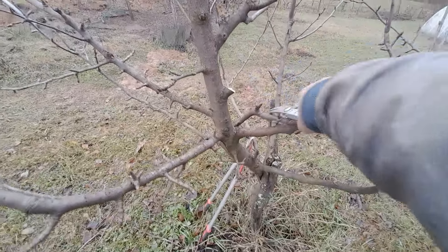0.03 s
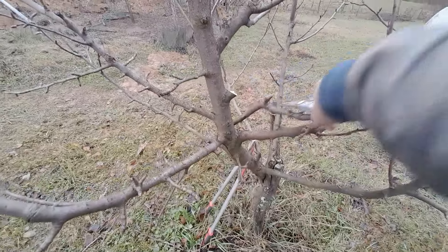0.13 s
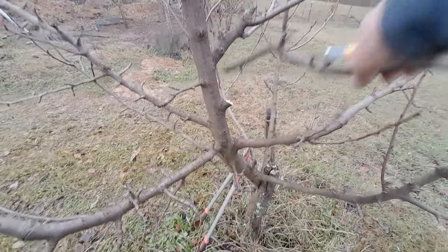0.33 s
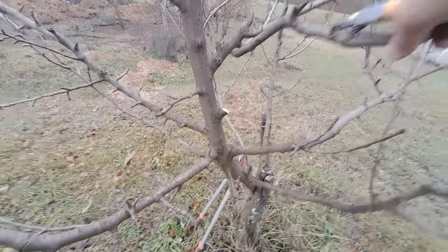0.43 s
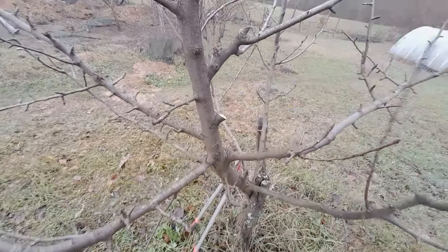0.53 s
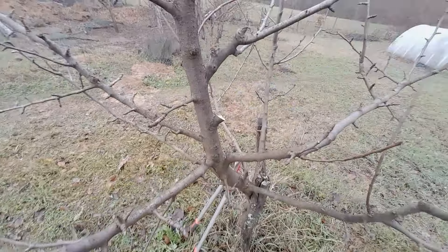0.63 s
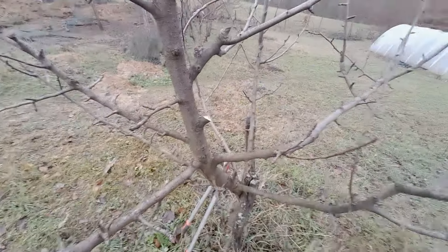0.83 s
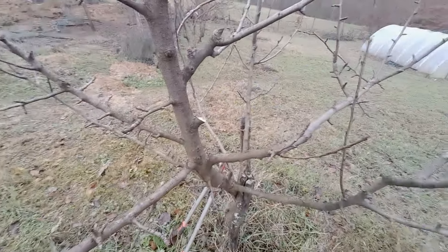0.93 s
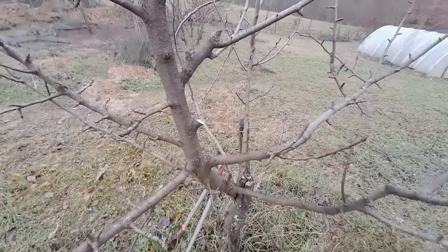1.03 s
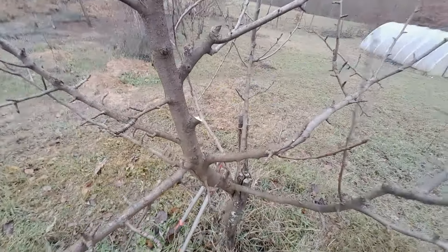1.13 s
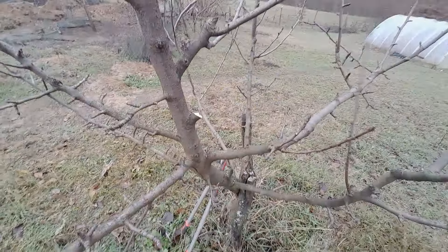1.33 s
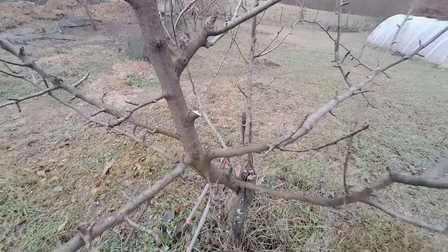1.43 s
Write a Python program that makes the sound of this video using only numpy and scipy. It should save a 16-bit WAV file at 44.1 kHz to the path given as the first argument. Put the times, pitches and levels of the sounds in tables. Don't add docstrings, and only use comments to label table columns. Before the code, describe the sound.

A cut twig is dragged from a small tree with dry rasps, woody knocks and crisp snaps, after light metal ticks; then pruning shears click sharply. Close stereo microphone, quiet orchard with faint hiss.

```python
import sys
import numpy as np
from scipy import signal
from scipy.fft import rfft, irfft
from scipy.io import wavfile
from scipy.ndimage import uniform_filter1d

SR = 44100
rng = np.random.default_rng(int(sys.argv[2]) if len(sys.argv) > 2 else 0)


def file_out(sig):
    cols = np.atleast_2d(sig).T
    lim = np.clip(cols, -1, 1)
    pcm = np.round(lim * 32767).astype(np.int16)
    wavfile.write(sys.argv[1], SR, pcm)


def boost(x):
    u = np.asarray(x, float) / 20
    return 10 ** u


N = 66150
HZ = np.fft.rfftfreq(N, 1 / SR)
T = np.arange(N) / SR

# pitch_hz, level_db [dB per Hz]
BARK_SPECTRUM = [(290, -18.5), (500, -20), (1550, -6.5), (1950, -8), (2890, -2.5), (4600, -6.5),
                 (6900, -7.5), (8960, -12), (16000, -13)]
# pitch_hz, likeness [-1 to 1]
NEAR_LIKENESS = [(100, 1), (600, 0.55), (1500, 0.39), (3000, 0.085), (6000, 0.043), (14000, 0.043)]
# pitch_hz, likeness [-1 to 1]
AIR_LIKENESS = [(60, 0.32), (240, 0.57), (950, -0.53), (3770, 0.46), (15000, -0.57)]
LAG_S = 0.000457


def evened(x):
    return x / np.sqrt(np.mean(x ** 2) + 1e-20)


def read(points, hz):
    f, value = np.transpose(points)
    return np.interp(np.log(hz + 1), np.log(f + 1), value)


def colour(x, points):
    return irfft(rfft(x) * evened(boost(read(points, HZ))), N)


def narrow_band(centre_hz, width_hz):
    noise = rfft(rng.standard_normal(N))
    return irfft(noise / (1 + ((HZ - centre_hz) / width_hz * 2) ** 2), N)


def swells(rows):
    return sum(boost(db) * np.exp(-((T - s) / length * 2) ** 2) for s, db, length in rows)


def add(mix, s, sound):
    part = mix[:, max(round(s * SR), 0):][:, :sound.shape[1]]
    part += sound[:, :part.shape[1]]


def ports(pair, likeness, lag_s, pan_db):
    first, second = rfft(pair)
    c = np.clip(read(likeness, HZ), -1, 1)
    left = (c * first + np.sqrt(1 - c ** 2) * second) * np.exp(-2j * np.pi * HZ * lag_s)
    return irfft(np.array([left * boost(pan_db / 2), first * boost(-pan_db / 2)]), N)


def grainy(per_s, spread_db, grain_s):
    size_db = spread_db * np.minimum(rng.exponential(1, N), 4)
    slips = boost(size_db) * (rng.random(N) < per_s / SR)
    r = np.exp(-1 / (grain_s * SR))
    envelope = evened(signal.lfilter([1], [1, -r], slips + 1e-4))
    return envelope * rng.standard_normal((2, N))


def patchy(x):
    z = signal.stft(x, nperseg=128, noverlap=96)[2]
    spots = uniform_filter1d(rng.standard_normal(z.shape[1:]), size=5, axis=0)
    spots = uniform_filter1d(spots, size=14, axis=1)
    patch_db = 2.3 * evened(spots)
    return signal.istft(z * boost(patch_db), nperseg=128, noverlap=96)[1][:, :N]


def split(low, high):
    fizz_hz = 7880
    up = np.clip((HZ - fizz_hz) / 800 + .5, 0, 1)
    return irfft(rfft(low) * (1 - up) + rfft(high) * up, N)


def ticks(rows, spectrum, trim_db):
    rise_s, crack_t60, tail_t60, tail_db = .0008, .008, .035, -17
    ring_cycles = 50
    crack, fizz, ring = np.zeros((3, 2, N))
    t = T[:4000]
    for s, db, hz, ring_db, *fizz_db in rows:
        rise = boost(db + trim_db) * np.minimum(t / rise_s, 1)
        decay = boost(-60 * t / crack_t60) + boost(tail_db - 60 * t / tail_t60)
        burst = rise * rng.standard_normal((2, 4000)) * decay
        add(crack, s, burst)
        add(fizz, s, burst * boost(sum(fizz_db)))
        turns = hz * np.array([[1], [.93], [1.36]]) * t
        modes = np.sin(2 * np.pi * turns + rng.random((3, 1))) * boost([[0], [-9], [-7]])
        tone = modes.sum(0, keepdims=True)
        add(ring, s, rise * tone * boost(ring_db - 60 * t * hz / ring_cycles))
    return colour(split(crack, fizz), spectrum) + ring


def twig_snaps():
    # start_s, peak_db, ring_hz, ring_share_db
    snap_rows = [(0.4653, -25.5, 2430, 6), (0.4714, -34.5, 2420, 4), (0.4914, -31, 2170, -5),
                 (0.4978, -25.5, 2330, 6), (0.5054, -30, 2355, 3.5), (0.5591, -29, 3640, -8),
                 (0.5666, -34, 3800, 5), (0.592, -36, 2500, 4.5), (0.6044, -37, 2700, -4),
                 (0.608, -20.5, 6040, 0), (0.6164, -32.5, 7300, 11), (0.6244, -39, 2920, 14),
                 (0.635, -15, 2815, -8.5), (0.6354, -32, 6390, 6), (0.6634, -37, 3960, -15),
                 (0.6848, -27, 7550, 3), (0.691, -33, 6550, 2), (0.6965, -22.5, 2450, -11),
                 (0.7005, -23, 5420, -8), (0.7272, -25.5, 3950, -15), (0.7364, -33.5, 2455, 0.5),
                 (0.7665, -49, 6600, -2), (0.7775, -54, 6000, -6), (0.8086, -38, 2320, -0.5),
                 (0.8185, -33, 2650, -4), (0.8254, -46, 2630, 7.5), (0.843, -38, 2600, 2.5),
                 (0.8924, -36, 1637, -7), (0.8994, -32, 2520, 1.5)]
    return ticks(snap_rows, BARK_SPECTRUM, -6.5)


def bark_drag():
    # start_s, length_s, effort_db
    strokes = [(0, 0.043, -61.5), (0.126, 0.077, -60.5), (0.174, 0.1, -59), (0.24, 0.081, -53.5),
               (0.322, 0.024, -60), (0.357, 0.076, -48), (0.433, 0.041, -46.5), (0.473, 0.039, -39),
               (0.522, 0.056, -51), (0.583, 0.048, -39.5), (0.634, 0.029, -49.5), (0.67, 0.034, -44.5),
               (0.721, 0.056, -62.5), (0.791, 0.069, -58), (0.879, 0.029, -53), (0.906, .025, -64),
               (1.032, 0.054, -63), (1.092, 0.018, -47), (1.107, 0.026, -58), (1.135, 0.058, -67.5),
               (1.307, 0.028, -66.5)]
    swell_power, let_go_t60 = 0.71, 0.026
    shape = np.zeros(N)
    for s, length, db in strokes:
        u = np.clip((T - s) / length, 0, 1)
        let_go_db = -60 * np.maximum(T - s - length, 0) / let_go_t60
        shape += (u > 0) * (0.26 + 0.99 * u ** swell_power) * boost(db + let_go_db)
    rasp = grainy(per_s=5000, spread_db=2.0, grain_s=.0004)
    return shape * evened(patchy(colour(rasp, BARK_SPECTRUM)))


def twig_slide():
    # time_s, effort_db, pitch_hz
    bend = [(0, -66, 500), (0.148, -76, 514), (0.248, -60, 780), (.35, -50, 820), (0.408, -49, 1360),
            (0.459, -53.5, 2600), (0.741, -59, 2350), (0.788, -68.5, 1450), (0.833, -53.5, 1280),
            (.87, -62, 1420), (.9, -55, 1420), (0.941, -69.5, 1260), (1.0, -74, 1150), (1.202, -77.5, 1320)]
    # pitch_hz, level_db [dB per Hz]
    wood_spectrum = [(100, -21.5), (250, -9.5), (700, -6), (1400, -12.5), (2500, -14.5), (5000, -54)]
    width_hz, tone_db, body_db = 1500, -5, 0.5
    s, db, hz = np.transpose(bend)
    slips = grainy(per_s=1200, spread_db=1.8, grain_s=.002)
    turn = np.exp(2j * np.pi * np.cumsum(np.interp(T, s, hz)) / SR)
    r = np.exp(-np.pi * width_hz / SR)
    tone = (turn * signal.lfilter([(1 - r) ** 2], [1, -2 * r, r * r], slips / turn)).real
    body = colour(slips, wood_spectrum)
    return (boost(tone_db) * evened(tone) + boost(body_db) * evened(body)) * boost(np.interp(T, s, db))


def wood_knocks():
    # start_s, peak_db, pitch_hz,
    # t60_s
    knock_rows = [(.0075, -49.5, 450, 0.051), (.0118, -49, 466, 0.028), (.186, -42.5, 1140, 0.0093),
                  (.3262, -31, 552, 0.011), (0.3495, -41, 695, 0.016), (0.3684, -19, 747, 0.015),
                  (0.3815, -61, 910, 0.0061), (0.3826, -18, 1017, 0.0068), (.3975, -39.5, 810, 0.017),
                  (.4045, -44, 1620, 0.025), (.412, -50, 1530, .015), (0.4185, -39, 1410, 0.019),
                  (.4285, -32, 940, 0.0042), (.439, -36, 217, 0.01), (0.465, -32.5, 170, 0.0146),
                  (0.8436, -41, 1455, 0.018), (0.851, -42, 1270, .01), (.896, -46.5, 500, 0.013),
                  (.902, -47.5, 210, 0.019), (1.033, -52.5, 800, 0.02), (1.034, -59.5, 1146, 0.039)]
    sag, sag_s = 0.62, 0.0003
    upper_ratio, upper_db = 2.3, -7.5
    out, t = np.zeros((2, N)), T[:4000]
    for s, db, hz, t60 in knock_rows:
        turns = hz * (t + sag * sag_s * (1 - np.exp(-t / sag_s)))
        low = -np.cos(2 * np.pi * turns) * boost(-60 * (t / t60) ** 1.5)
        high = np.sin(2 * np.pi * upper_ratio * hz * t) * boost(upper_db - 60 * t / (0.74 * t60))
        push = np.sin(np.pi / 2 * np.minimum(turns / 1.2, 1)) ** 2
        blow = boost(db) * push * (low + high)
        blow = signal.lfilter(*signal.butter(2, .5 * hz, "high", fs=SR), blow)
        add(out, s, np.array([blow, blow]))
    return out


def shear_clicks():
    # start_s, peak_db, ring_hz, ring_share_db, fizz_db
    click_rows = [(0.0004, -32, 2300, -16, -25), (0.0283, -33, 4200, -3, -8.5), (0.1675, -50, 4390, 11, 4),
                  (0.1735, -45, 4300, 6, -4), (0.1835, -30.5, 4550, -1, -2), (0.1865, -33.5, 2940, -1, -21),
                  (0.2438, -22, 6760, -4.5, -3.5), (0.2442, -29, 2700, -6.5, -5),
                  (0.2505, -39, 3870, 7, -5), (0.2703, -39, 6600, -6, 8), (0.2905, -34, 6900, 0, -5),
                  (0.318, -26.5, 2680, -8, -20), (1.0316, -24, 2620, -13, -13.5),
                  (1.033, -29, 6000, -3, -24), (1.0494, -33, 7450, -0.5, -16), (1.0848, -56, 6900, 0, -8),
                  (1.0982, -19, 6810, -3, 6), (1.0988, -35, 2573, 6, -2), (1.1064, -30, 7170, 10, -4),
                  (1.1105, -32, 3000, -3, -10), (1.1025, -22, 3940, -14, -13), (1.1188, -43, 7360, 4, 1),
                  (1.1712, -38, 3280, -13, -3), (1.1838, -41.5, 6220, -1, 0)]
    # pitch_hz, level_db [dB per Hz]
    steel_spectrum = [(700, -25), (1250, -7), (1600, 0.5), (2700, -2.5), (5200, -5), (7200, -6.5),
                      (9600, -2), (16000, -6.5)]
    # time_s, left_over_right_db
    hand_side = [(.3, 6.5), (1.0, -3)]
    side_db = np.interp(T, *np.transpose(hand_side))
    pair = ports(ticks(click_rows, steel_spectrum, -8), NEAR_LIKENESS, LAG_S, 0)
    return pair * boost([side_db / 2, -side_db / 2])


def spring_rubs():
    # middle_s, level_db, length_s
    rub_rows = [
        (1.063, -55, 0.0029),
        (1.072, -53, 0.005),
        (1.127, -54, 0.0046),
        (1.257, -74.5, 0.038),
        (1.322, -62.5, 0.021),
        (1.332, -68, 0.0035),
        (1.346, -71.5, 0.054),
    ]
    return np.array([swells(rub_rows) * evened(narrow_band(2420, 370))] * 2)


def arm_puffs():
    # middle_s, level_db, length_s
    puff_rows = [
        (0.065, -65.5, 0.21),
        (0.314, -54.5, 0.049),
        (0.372, -48, 0.023),
        (0.441, -50.5, 0.054),
        (0.518, -55, 0.089),
        (0.67, -57, 0.11),
        (0.753, -57.5, 0.031),
        (0.907, -61.5, 0.1),
        (1.054, -66, 0.048),
        (1.123, -66, 0.047),
    ]
    # pitch_hz, level_db [dB per Hz]
    puff_spectrum = [(30, -45), (55, 3.5), (120, -1), (220, -3), (400, -22)]
    breath = evened(colour(rng.standard_normal((2, N)), puff_spectrum))
    return ports(swells(puff_rows) * breath, AIR_LIKENESS, 0, -0.29)


def orchard_air():
    # pitch_hz, level_db [dB per Hz]
    hiss_spectrum = [(18, -84), (30, -20), (98, 3), (188, -13.5), (354, -11), (984, -7), (2810, -17.5),
                     (6690, -18), (15900, -20.5)]
    hiss_db, drone_db = -68.5, -75.5
    hiss = boost(hiss_db) * evened(colour(rng.standard_normal((2, N)), hiss_spectrum))
    drone = narrow_band(60, 27)
    drone = drone / np.sqrt(abs(signal.hilbert(evened(drone))) + .1)
    return ports(hiss, AIR_LIKENESS, 0, 0) + boost(drone_db) * evened(drone)


def scene():
    # pitch_hz, left_over_right_db
    tree_side = [(60, -14), (180, -5.5), (550, -6), (1650, -4), (4970, 2.5), (15000, 0.5)]
    twig = twig_snaps() + bark_drag() + twig_slide()
    tree = ports(twig, NEAR_LIKENESS, LAG_S, read(tree_side, HZ))
    solid = ports(wood_knocks() + spring_rubs(), [(100, 1), (9000, 1.0)], LAG_S, -7)
    return tree + solid + shear_clicks() + arm_puffs() + orchard_air()


def roll_off(x):
    return signal.sosfilt(signal.butter(12, 16820, fs=SR, output="sos"), x)


def record(dry):
    peak_hz = [
        [6600],
        [7600],
    ]
    dip_hz = [
        [9150],
        [10090],
    ]
    edge_hz, over_edge_db = 15900, -22
    peak = np.exp(-((HZ - np.array(peak_hz)) / 830) ** 2)
    dip = np.exp(-((HZ - np.array(dip_hz)) / 750) ** 2)
    port_db = 4.5 * peak - 8.5 * dip
    gain = boost(port_db + over_edge_db * (HZ > edge_hz)) * (HZ < edge_hz + 750)
    mix = irfft(rfft(dry) * gain, N)
    return roll_off(mix)


dry = scene()
out = record(dry)
file_out(out)
```